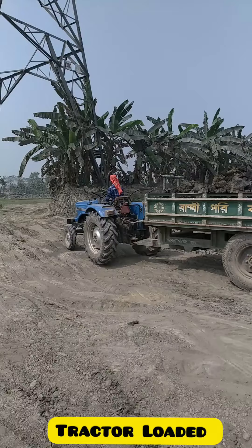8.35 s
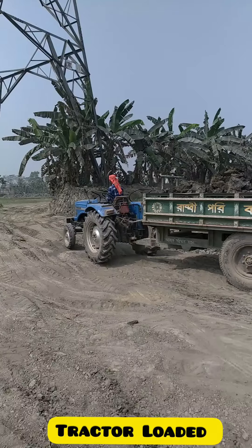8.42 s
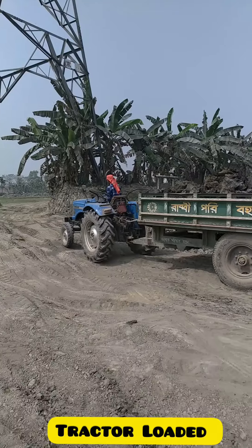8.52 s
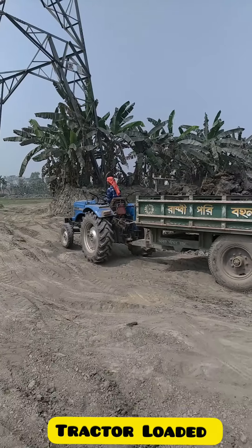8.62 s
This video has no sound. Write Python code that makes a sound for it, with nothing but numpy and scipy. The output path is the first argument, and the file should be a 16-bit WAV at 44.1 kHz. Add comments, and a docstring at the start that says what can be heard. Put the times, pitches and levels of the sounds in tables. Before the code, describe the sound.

A diesel tractor clatters and labours as it moves away, its loaded steel trailer groaning, clanking and squeaking over ruts.

```python
"""A field of rutted soil: a diesel tractor drags a loaded steel trailer away from a phone.
The engine sags under the load, then its governor hunts. The block clatters; once a cycle an injector
ticks and a chuff rings the exhaust pipe, over a low boom. The trailer rumbles through ruts: its body
groans, jolts shake panels and fittings, dry joints squeak, the hitch knocks and a loose pin clinks.
Stones crack under the tyres, and the rig fades as it moves off."""
import sys
import numpy as np
from scipy import signal
from scipy.fft import rfft, irfft, next_fast_len
from scipy.io import wavfile
from scipy.ndimage import uniform_filter1d, map_coordinates

SR = 44100
rng = np.random.default_rng(int(sys.argv[2]) if len(sys.argv) > 2 else 0)


def digitize_waveform(pressure):
    """Quantize a signal to 16-bit integers and store it at the path in sys.argv[1].

    Rows of a 2-D input are taken as channels; values are limited to [-1, 1].
    """
    field = np.atleast_2d(pressure).T
    bounded = np.clip(field, -1, 1)
    quanta = np.round(bounded * 32767).astype(np.int16)
    wavfile.write(sys.argv[1], SR, quanta)


N = 382347
TIME = np.arange(N) / SR

# the rig eases off and recedes: (time [s], rumble [dB], engine block [dB])
RIG_LEVELS = [(0, -24, -24.5), (.75, -26, -27.5), (1.35, -24, -28.5), (2.2, -32.5, -36.5),
              (3.7, -34.5, -41), (4.55, -43, -41.5), (6.1, -41.5, -43), (6.7, -46, -43.5),
              (8.67, -46.5, -44.5)]
# trailer side panels: (frequency [Hz], width [Hz], gain [dB])
PANEL_MODES = [(345, 39, 5), (659, 65, 9.5), (1086, 22, 6), (1354, 29, 6.5), (1625, 43, 2.5), (2200, 50, 6),
               (2426, 110, 11)]
# trailer bed: (frequency [Hz], width [Hz], gain [dB])
BED_MODES = [(353, 71, 2), (265, 94, -5), (550, 140, -13)]


def amp(db):
    """Decibels to gain."""
    return 10 ** (np.asarray(db) / 20)


def unit(x):
    """Scale to rms 1."""
    return x / np.sqrt(np.mean(x ** 2) + 1e-20)


def along(points, hz):
    """Read (frequency [Hz], value) points on a log axis."""
    point_hz, values = np.transpose(points)
    return np.interp(np.log(hz + 1), np.log(point_hz + 1), values)


def curves(rows):
    """One per-sample curve for each column after the time."""
    time_s, *columns = np.transpose(rows)
    return [np.interp(TIME, time_s, column) for column in columns]


def wobble(rate_hz):
    """Smooth random curve, rate_hz knots a second."""
    knots = rng.standard_normal(int(N * rate_hz / SR) + 4)
    return map_coordinates(knots, [TIME * rate_hz], order=2)


def filtered(x, response):
    """Apply a complex frequency response."""
    size = next_fast_len(N + 8192, True)
    hz = np.fft.rfftfreq(size, 1 / SR)
    return irfft(rfft(x, size) * response(hz), size)[..., :N]


def noise(spectrum, modes=()):
    """Stereo noise of rms 1, partly alike at the phone's two ports, raised at any modes."""
    # left-right likeness: (frequency [Hz], correlation [0-1])
    likeness = [(200, 0.95), (550, 0.76), (880, 0.47), (1150, 0.57), (2350, 1), (3500, 0.88), (4800, 0.15),
                (7500, 0.91), (10000, .1)]

    def mid_side_gains(hz):
        alike = np.clip(along(likeness, hz), 0, 1)
        peaks_db = sum(db / (1 + (2 * (hz - mode_hz) / width_hz) ** 2) for mode_hz, width_hz, db in modes)
        return amp(along(spectrum, hz) + peaks_db) * np.sqrt([1 + alike, 1 - alike])
    mid, side = filtered(rng.standard_normal((2, N)), mid_side_gains)
    return unit(np.array([mid + side, mid - side]))


def strokes(phase, rise, decay, scatter_db):
    """Envelope of rms 1 that fires at each whole phase; rise and decay in periods."""
    count = np.floor(phase - np.floor(phase[0])).astype(int)
    strengths = amp(scatter_db * np.clip(rng.standard_normal(4096), -1.7, 1.7))
    age = phase % 1
    return unit(strengths[count % 4096] * (1 - np.exp(-age / rise)) * np.exp(-age / decay))


def burst(start_s, length_s, rise_s, decay_s):
    """Sample span and envelope of a contact that swells, holds and rings out."""
    span = slice(max(int(start_s * SR), 0), int((start_s + length_s + 8 * decay_s) * SR))
    age_s = np.maximum(TIME[span] - start_s, 0)
    return span, (1 - np.exp(-age_s / rise_s)) * np.exp(-np.maximum(age_s - length_s, 0) / decay_s)


def engine_speed():
    """Four-stroke cycles a second: the load sets the mean; after the sag the governor hunts around it."""
    # speed under load: (time [s], mean cycle rate [Hz])
    mean_speed = [(0, 22.8), (.3, 23.74), (.4, 20.05), (1.11, 20.62), (1.256, 16.86), (2.515, 15.1),
                  (2.847, 19.06), (3.773, 17.99), (6.514, 18.61), (6.644, 21.25), (6.93, 16.64),
                  (7.103, 19.92), (8.67, 16.5)]
    hunt_from_s, hunt_rate_hz, hunt_depth_hz = 3.264, 1.975, 1.13
    hunt = np.sin(2 * np.pi * hunt_rate_hz * np.maximum(TIME - hunt_from_s, 0))
    return curves(mean_speed)[0] + hunt_depth_hz * hunt


def engine_block(cycle, swell_db):
    """Three cylinders knock in turn, one harder; the block clatters and hisses, the hood rings."""
    # block clatter and hiss: (frequency [Hz], density [dB])
    clatter_spectrum = [(300, -62), (650, -1), (1000, -4.5), (1370, 3), (1850, -3.5), (2350, -1.5),
                        (3000, -8.5), (4200, -13.5), (8000, -46)]
    hiss_spectrum = [(1500, -4), (3100, 0), (4200, 6), (7500, -0.5), (14000, -11)]
    # sheet-metal hood: (frequency [Hz], width [Hz], gain [dB])
    hood_modes = [(1357, 180, 2.5)]
    block_db = curves(RIG_LEVELS)[1]
    clatter_db = block_db + 0.46 * swell_db + 0.79 * wobble(19)
    hiss_db = block_db - 5.5 + 0.61 * swell_db
    firing = strokes(3 * cycle + .45, rise=.06, decay=.7, scatter_db=1.5)
    hard_firing = strokes(cycle + .18, rise=.04, decay=.35, scatter_db=3)
    beat = unit(1.05 + .8 * firing + .7 * hard_firing)
    clatter = amp(clatter_db) * noise(clatter_spectrum, hood_modes)
    hiss = amp(hiss_db) * noise(hiss_spectrum)
    return beat * (clatter + hiss) + injector(cycle, swell_db, hiss_spectrum)


def injector(cycle, swell_db, clack_spectrum):
    """One injector ticks above the rest, once a cycle: its line rings, with a dry clack of varying size."""
    # tick: (time [s], level [dB])
    tick_levels = [(0, -50.5), (3.5, -46.5), (4.6, -46.5), (5.8, -50), (6.4, -55), (8.67, -60)]
    # tick: (frequency [Hz], density [dB])
    tick_spectrum = [(500, -17), (1400, -17), (2400, 7), (3200, -38), (4400, 16), (5600, 0.5), (7600, 9),
                     (9000, -10.5), (14000, -13)]
    # injector line: (frequency [Hz], width [Hz], gain [dB])
    line_modes = [(4110, 140, 16), (5050, 340, 9), (6950, 150, 1), (10100, 990, 21)]
    phase = cycle + .16
    snap = strokes(phase, rise=.012, decay=.09, scatter_db=3)
    tail = strokes(phase, rise=.02, decay=.35, scatter_db=2)
    ring = unit(snap + .4 * tail) * noise(tick_spectrum, line_modes)
    clack = amp(-6.5) * strokes(phase, rise=.008, decay=.08, scatter_db=5) * noise(clack_spectrum)
    return amp(curves(tick_levels)[0] + 0.43 * swell_db) * (ring + clack)


def exhaust_chuff(cycle, cycle_hz):
    """One hard chuff a cycle rings the pipe, each at a slightly different pitch."""
    # chuff: (time [s], level [dB])
    chuff_levels = [(0, -29.5), (.9, -30), (1.4, -35.5), (2.2, -49), (8.67, -64)]
    # exhaust pipe: (frequency [Hz], decay [s], gain [dB])
    pipe_modes = [(510, 0.0047, 6.5), (312.5, 0.02, -0.5)]
    phase = cycle + .5
    age_s = phase % 1 / cycle_hz
    detune = 1 + 0.03 * rng.standard_normal(4096)[phase.astype(int)]
    ring = np.zeros(N)
    for hz, decay_s, db in pipe_modes:
        envelope = age_s / decay_s * np.exp(-2 * age_s / decay_s)
        ring += amp(db) * envelope * np.sin(2 * np.pi * hz * detune * age_s)
    return amp(curves(chuff_levels)[0] + 1.3 * wobble(25)) * unit(ring)


def exhaust_boom():
    """A low, slightly unsteady exhaust note that fades as the rig recedes."""
    # boom: (time [s], pitch [Hz], level [dB])
    boom_track = [(0, 114.2, -41.5), (.35, 104.8, -36), (.6, 103.9, -38), (1.35, 105.6, -32.5),
                  (1.55, 110.6, -35), (2, 118, -45), (8.67, 116, -64)]
    hz, db = curves(boom_track)
    phase_rad = 2 * np.pi * np.cumsum(hz) / SR + 0.21 * wobble(25.5)
    return amp(db + 0.43 * wobble(6.6)) * unit(np.sin(phase_rad))


def rumble(cycle, swell_db):
    """Exhaust and rolling trailer throb once a cycle, over a low drone that carries across the field."""
    # rumble and drone: (frequency [Hz], density [dB])
    rumble_spectrum = [(25, -37), (70, -18), (110, -4), (170, -6.5), (250, 0.5), (350, -0.5), (480, -4),
                       (1100, -14), (3000, -42)]
    drone_spectrum = [(25, -21), (45, -25), (80, -7), (130, -0.5), (210, 0.5), (400, -11), (1500, -35)]
    # faint steady tones in both: (frequency [Hz], width [Hz], gain [dB])
    tones = [(214, 11, 2.5), (328, 17, 1.5), (504.5, 8.7, 5)]
    drone_start_db, fade_db_per_s = -38.5, 0.86
    drone_db = drone_start_db - fade_db_per_s * TIME + 0.75 * swell_db
    rumble_db = curves(RIG_LEVELS)[0] + swell_db + 0.85 * wobble(22)
    throb = unit(1.7 + strokes(cycle + .5, rise=.06, decay=.45, scatter_db=2))
    drone = amp(drone_db) * noise(drone_spectrum, tones)
    return amp(rumble_db) * throb * noise(rumble_spectrum, tones) + drone


def reflections(x, depth_db):
    """Drifting random band gains stand for echoes off the soil and the moving steel sides."""
    bands = signal.stft(x, nperseg=2048)[2]
    ripple = uniform_filter1d(rng.standard_normal(bands.shape[1:]), size=3, axis=0)
    ripple = uniform_filter1d(ripple, size=6, axis=1)
    gain = unit(amp(depth_db * unit(ripple)))
    return signal.istft(bands * gain, nperseg=2048)[1][:, :N]


def groans(cycle):
    """The strained trailer body sounds short, rough, sagging notes, shaken by each engine cycle; the last two
    notes are the body ringing on after the heavy thumps at 2.5 s and 4.86 s."""
    # groans, the last two rows the ring after a thump: (start [s], length [s], mid pitch [Hz], level [dB])
    notes = [(0.391, 0.24, 289, -23), (1.075, 0.069, 282, -20), (1.07, 0.15, 362, -25),
             (1.1, 0.074, 474, -25), (1.2, 0.064, 263.5, -21), (1.35, 0.076, 465, -23.5),
             (1.449, 0.082, 260, -26), (1.66, .13, 228, -24), (1.67, 0.1, 458, -25.5),
             (2.04, 0.057, 461, -26), (2.5, 0.047, 124.4, -26.5), (4.856, 0.021, 375.6, -24)]
    pitch_sag = 0.022
    waver_rad = .6 * wobble(90)
    shake = strokes(cycle + .5, rise=.06, decay=.35, scatter_db=3)
    roughness = unit(1 + .6 * shake + .3 * wobble(110))
    out = np.zeros(N)
    for start_s, length_s, hz, db in notes:
        span, envelope = burst(start_s, length_s, rise_s=length_s / 5, decay_s=0.049)
        pitch_hz = hz * (1 + pitch_sag * np.interp(TIME[span], [start_s, start_s + length_s], [.5, -.5]))
        tone = np.sin(2 * np.pi * np.cumsum(pitch_hz) / SR + waver_rad[span])
        out[span] += amp(db) * envelope * roughness[span] * tone
    return out


def jolts():
    """Each jolt makes side panels chatter and fittings rattle; the heavy bed thuds later and longer."""
    # jolts: (start [s], length [s], thud [dB], clank [dB], rattle [dB])
    events = [(0.526, 0.052, -48, -45, -33.5), (0.965, 0.029, -45, -20.5, -34),
              (1.743, 0.043, -57, -27.5, -31.5), (2.343, 0.047, -34, -35.5, -46),
              (2.415, 0.026, -48, -28.5, -48), (2.497, 0.038, -30, -27, -49), (2.754, 0.028, -28, -23, -40),
              (2.835, 0.12, -36.5, -34.5, -41), (3.005, 0.041, -34, -30, -43),
              (3.074, 0.025, -31.5, -32, -36), (3.329, 0.096, -32.5, -27.5, -59),
              (3.411, 0.018, -35, -41, -32), (3.576, 0.04, -28, -31.5, -45), (4.747, 0.038, -58, -34, -43),
              (4.852, 0.052, -27, -32, -28), (5.227, 0.037, -29, -29, -30.5),
              (5.282, 0.046, -33, -28.5, -37), (5.645, 0.026, -33, -34.5, -41),
              (6.381, 0.088, -43, -39, -41), (6.846, 0.047, -37, -41, -59)]
    # bed, panels and loose fittings: (frequency [Hz], density [dB])
    thud_spectrum = [(40, -57), (85, -13), (135, -5), (250, 2.5), (380, -4), (540, 1.5), (900, -15),
                     (3000, -49)]
    clank_spectrum = [(200, -46), (550, 2.5), (850, 1.5), (1150, 10), (1500, 11.5), (2400, 2), (3000, 3.5),
                      (7000, -12), (14000, -74)]
    rattle_spectrum = [(1500, -43), (3300, 0.5), (4500, 11.5), (6500, 6.5), (8000, 7.5), (14000, -8)]
    thud_lag_s, thud_stretch, chatter_hz = 0.0056, 1.39, 85
    thud, clank, rattle = np.zeros((3, N))
    for start_s, length_s, thud_db, clank_db, rattle_db in events:
        span, envelope = burst(start_s + thud_lag_s, thud_stretch * length_s, rise_s=.0022, decay_s=.055)
        thud[span] += amp(thud_db) * envelope
        span, envelope = burst(start_s, length_s, rise_s=.004, decay_s=.024)
        clank[span] += amp(clank_db) * envelope
        rattle[span] += amp(rattle_db) * envelope
    chatter = unit(1.3 + strokes(chatter_hz * TIME + .4 * wobble(40), rise=.07, decay=1.0, scatter_db=2))
    bed = thud * noise(thud_spectrum, BED_MODES)
    panels = clank * noise(clank_spectrum, PANEL_MODES)
    fittings = rattle * noise(rattle_spectrum)
    return bed + chatter * (panels + fittings)


def squeaks():
    """Dry steel joints stick and slip: smooth ones squeal, gritty ones sputter and scatter in pitch."""
    # squeaks: (start [s], length [s], pitch [Hz], level [dB], grit [0-1])
    events = [(0.564, 0.02, 4600, -26, 0.3), (0.992, 0.018, 2274, -18.5, 1),
              (1.758, 0.032, 6800, -31.5, .8), (2.938, 0.021, 2050, -24.5, .3),
              (2.943, 0.01, 4120, -25.5, 0.6), (3.013, 0.021, 3270, -19, 0.86),
              (3.092, 0.022, 6670, -35, .7), (3.587, 0.018, 2760, -25.5, 1),
              (5.196, 0.036, 2650, -27, 0.67), (5.197, 0.068, 5300, -23, 0.9),
              (5.374, 0.031, 4390, -22.5, 0.4)]
    slip_rate_hz, pitch_jump, pitch_arch = 102, 0.013, 0.012
    waver_rad = .25 * wobble(900) + .7 * wobble(200)
    flutter = .5 * wobble(1100)
    out = np.zeros(N)
    for start_s, length_s, hz, db, grit in events:
        span, envelope = burst(start_s, length_s, rise_s=0.0011, decay_s=0.01)
        age_s = np.maximum(TIME[span] - start_s, 0)
        slips = slip_rate_hz * rng.uniform(.85, 1.15) * age_s
        grip = unit((1.4 - grit + np.abs(np.sin(np.pi * slips))) * (1 + grit * flutter[span]))
        jump, strength = rng.standard_normal((2, 64))[:, slips.astype(int) % 64]  # per slip
        arch = np.sin(np.pi * np.minimum(age_s / length_s, 1)) - 2 / np.pi  # as the joint turns
        pitch_hz = hz * (1 + grit * (pitch_arch * arch + pitch_jump * jump))
        tone = np.sin(2 * np.pi * np.cumsum(pitch_hz) / SR + grit * waver_rad[span])
        out[span] += amp(db + 2 * grit * strength) * envelope * grip * tone
    return out


def struck(blows, modes, rise_s, detune):
    """Each blow rings the modes; where it lands shifts their balance and, by the share detune, pitch."""
    out, age_s = np.zeros(N), np.arange(SR // 10) / SR
    hz, width_hz, mode_db = np.transpose(modes)[:, :, None]
    envelopes = (1 - np.exp(-age_s / rise_s)) * np.exp(-np.pi * width_hz * age_s)
    for start_s, peak_db in blows:
        colour, shift, phase = rng.standard_normal((3, len(modes), 1))
        partials = np.sin(2 * np.pi * (hz * (1 + detune * shift) * age_s + phase))
        ring = np.sum(amp(mode_db + 2 * colour) * envelopes * partials, axis=0)
        out[int(start_s * SR):][:len(age_s)] += amp(peak_db) * ring / np.abs(ring).max()
    return out


def knocks():
    """Panels hit their posts, the bed bumps its stops, the hitch takes up slack, a loose pin clinks."""
    # blows: (time [s], peak [dB])
    panel_blows = [(1.0, -14), (2.343, -23), (2.361, -21), (2.523, -13), (3.342, -15), (3.347, -9.5),
                   (3.372, -10), (3.377, -9.5), (3.398, -9.5), (3.410, -15), (3.532, -19.5), (3.589, -20)]
    bed_blows = [(2.523, -19), (3.432, -20), (4.195, -28), (4.858, -9.5), (4.878, -11.5), (4.898, -12.5),
                 (4.919, -15.5), (4.949, -12), (5.328, -19.5)]
    hitch_blows = [(5.274, -14), (5.293, -11.5), (5.300, -7.5), (5.312, -16), (5.327, -15)]
    pin_blows = [(5.671, -28), (7.004, -33), (7.229, -29.5), (7.331, -25.5)]
    # hitch and steel pin: (frequency [Hz], width [Hz], gain [dB])
    hitch_modes = [(592, 21, 1), (1480, 45, 8.5), (1630, 70, 2), (3680, 56, 7)]
    pin_modes = [(2410, 79, 1), (4270, 30, -1), (5660, 40, -11), (6400, 80, -1)]
    return (struck(panel_blows, PANEL_MODES, rise_s=0.0012, detune=0.012)
            + struck(bed_blows, BED_MODES, rise_s=0.0049, detune=0.043)
            + struck(hitch_blows, hitch_modes, rise_s=0.0014, detune=0.013)
            + struck(pin_blows, pin_modes, rise_s=0.00036, detune=0.004))


def stone_cracks():
    """Stones give way under the tyres with short, bright crunches."""
    # cracks: (start [s], length [s], level [dB])
    events = [(2.414, 0.02, -27.5), (2.758, 0.02, -17), (4.857, 0.012, -24.5), (6.385, 0.052, -36.5),
              (7.303, 0.037, -38.5)]
    # cracking stone: (frequency [Hz], density [dB])
    stone_spectrum = [(1000, -30), (4000, 4), (7500, 5.5), (14000, 1.5)]
    level = np.zeros(N)
    for start_s, length_s, db in events:
        span, envelope = burst(start_s, length_s, rise_s=0.0026, decay_s=0.011)
        level[span] += amp(db) * envelope
    return level * noise(stone_spectrum)


def rut_swell():
    """The rig swells as its wheels roll through each rut: one smooth hump, in dB."""
    # ruts: (middle [s], half length [s], swell [dB])
    ruts = [(2.53, 0.14, 7.5), (2.907, 0.13, 4.5), (4.25, 0.1, 7.5), (4.864, 0.19, 9), (5.767, 0.11, 4),
            (6.143, 0.19, 4.5), (7.03, .12, 4.5), (8.404, 0.044, 4.5)]
    return sum(db * np.exp(-((TIME - middle_s) / half_s) ** 2) for middle_s, half_s, db in ruts)


def scene():
    """The whole rig; firing, tick, chuff and throb are locked to the crankshaft."""
    cycle_hz, swell_db = engine_speed(), rut_swell()
    cycle = np.cumsum(cycle_hz) / SR
    machine = reflections(engine_block(cycle, swell_db) + rumble(cycle, swell_db), depth_db=2.5)
    exhaust = exhaust_chuff(cycle, cycle_hz) + exhaust_boom()
    trailer = groans(cycle) + jolts() + squeaks() + knocks()
    return machine + exhaust + trailer + stone_cracks()


def record(dry):
    """The phone's two ports differ in phase and level; the top treble is shelved down, then cut."""
    # microphone: (frequency [Hz], gain [dB])
    response = [(30, -7.5), (54, -1), (7600, 1), (8300, -16.5), (12500, -14.5), (15000, -30)]
    # port phase: (frequency [Hz], left lead [rad])
    left_lead = [(100, 0.11), (400, 0.72), (750, 1), (1050, -2), (2200, -1.5), (2850, -1.94), (3700, -3.5),
                 (4500, -5), (7500, -4.5)]
    # port balance: (frequency [Hz], left minus right [dB])
    balance = [(120, -0.5), (500, 2), (1050, -0.5), (2350, 4), (2900, -1), (5700, -3.5), (7000, -1.5),
               (12000, 3.5)]
    cutoff_hz = 15200

    def ports(hz):
        left = amp(along(balance, hz) / 2) * np.exp(.5j * along(left_lead, hz))
        return np.array([left, 1 / left]) * amp(along(response, hz)) * (hz < cutoff_hz)
    return filtered(dry, ports)


dry = scene()
out = record(dry)
digitize_waveform(out)
```